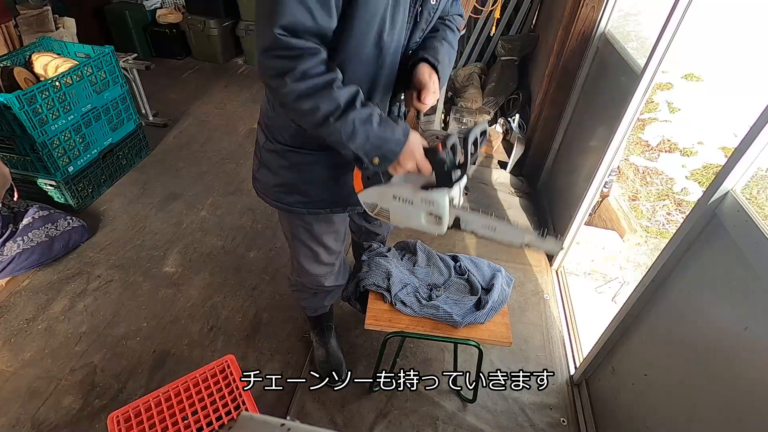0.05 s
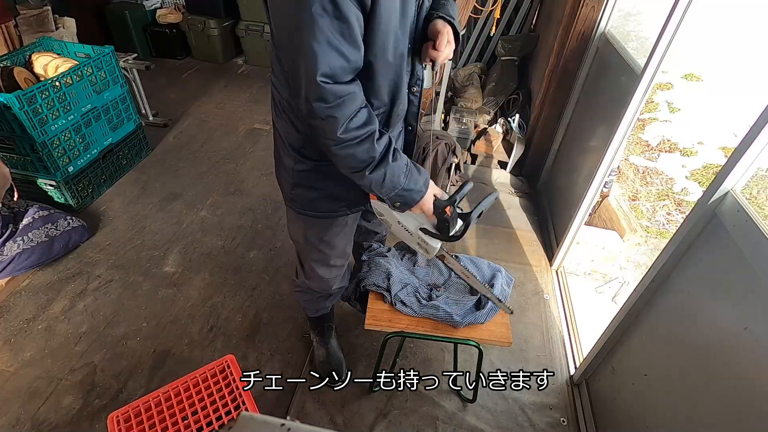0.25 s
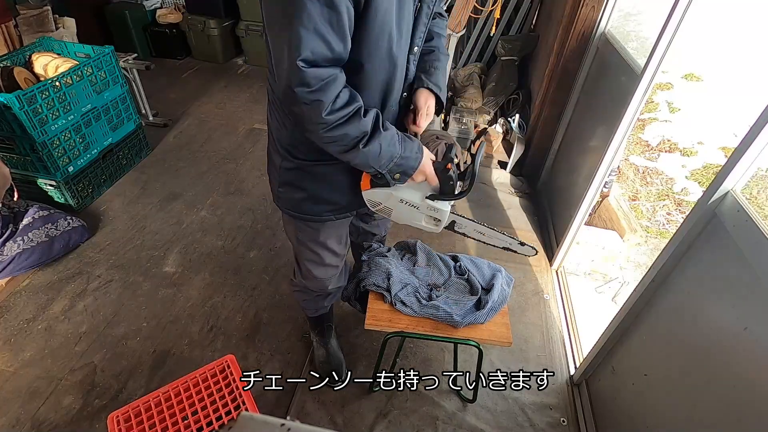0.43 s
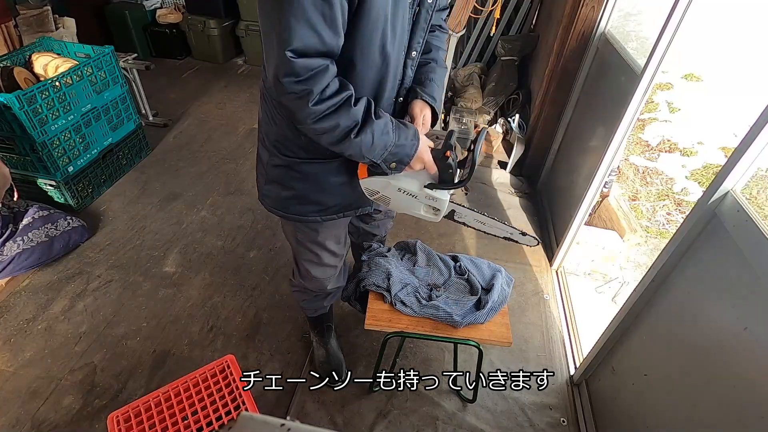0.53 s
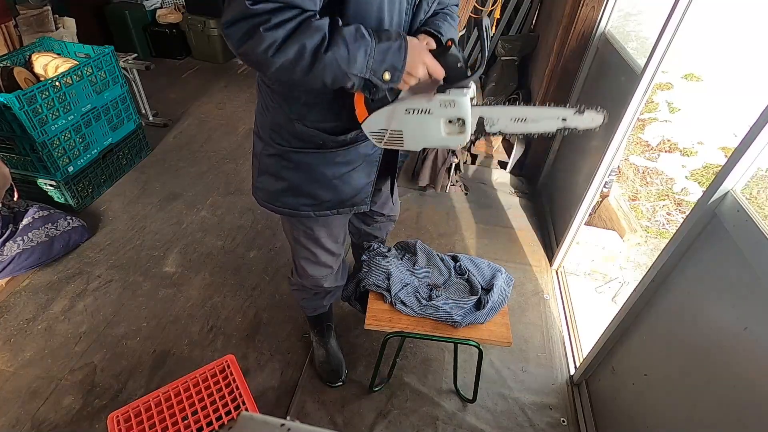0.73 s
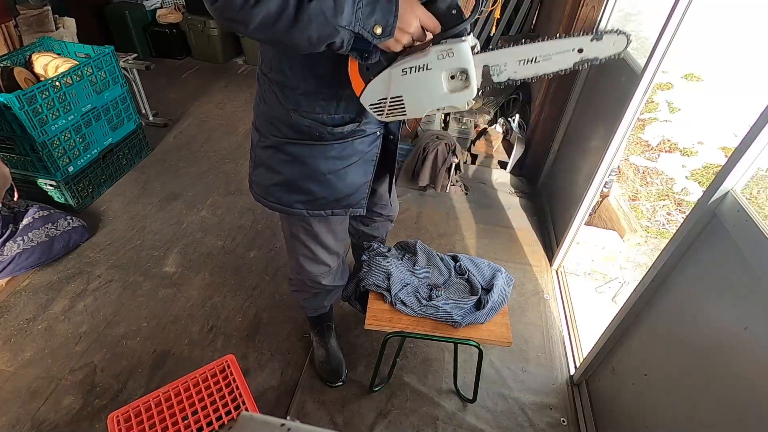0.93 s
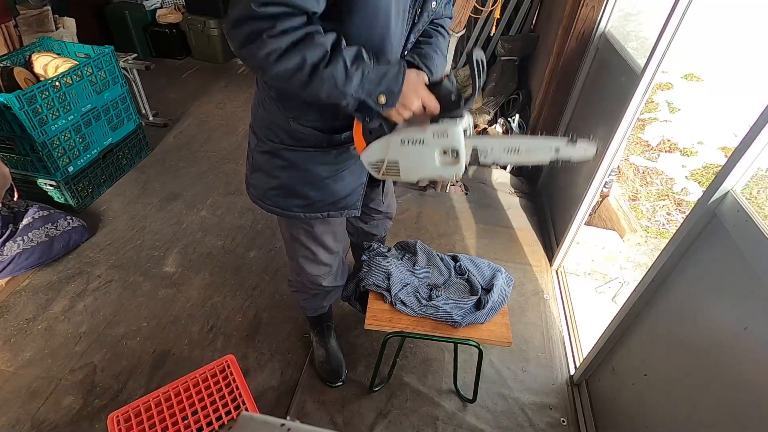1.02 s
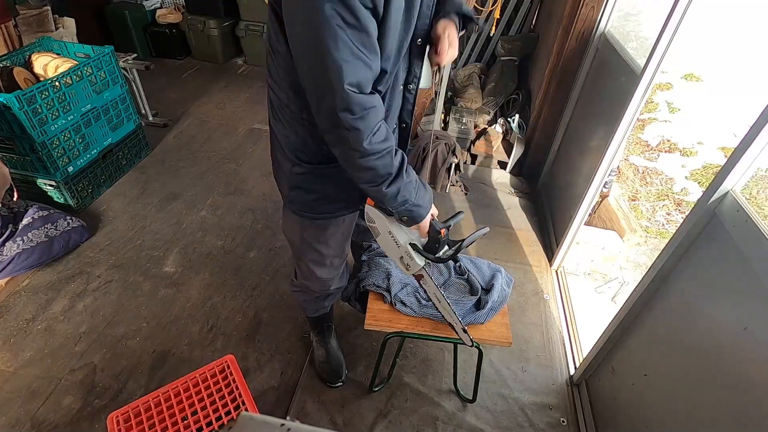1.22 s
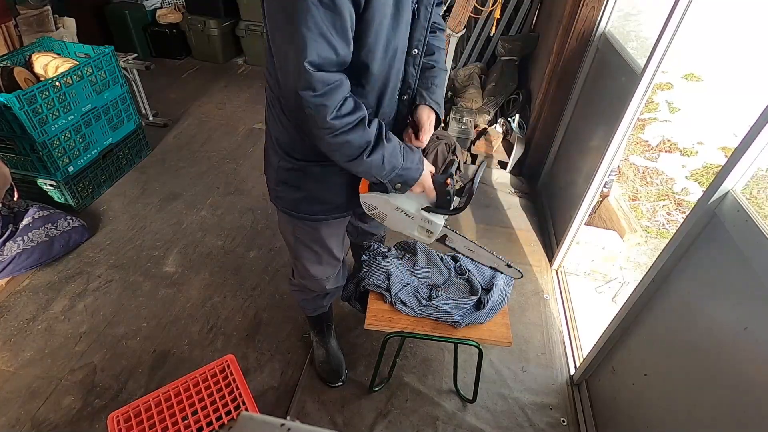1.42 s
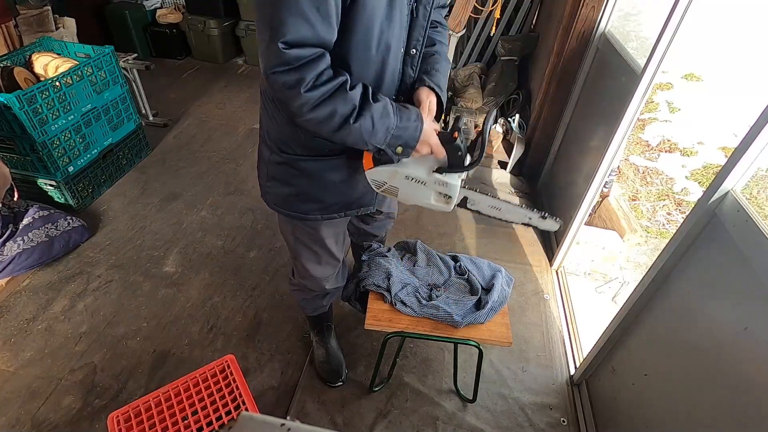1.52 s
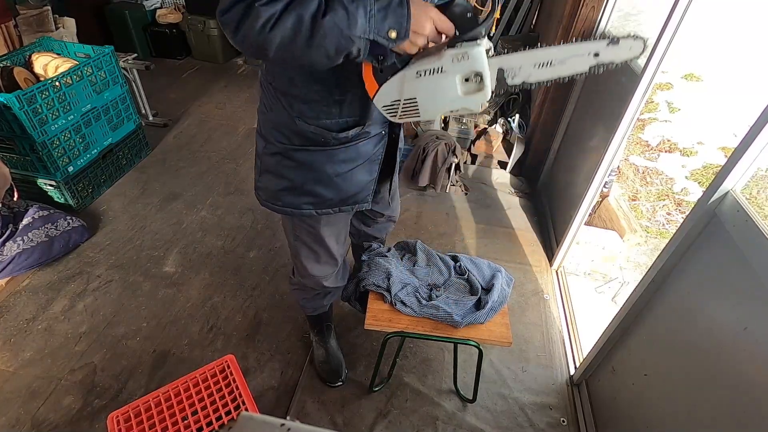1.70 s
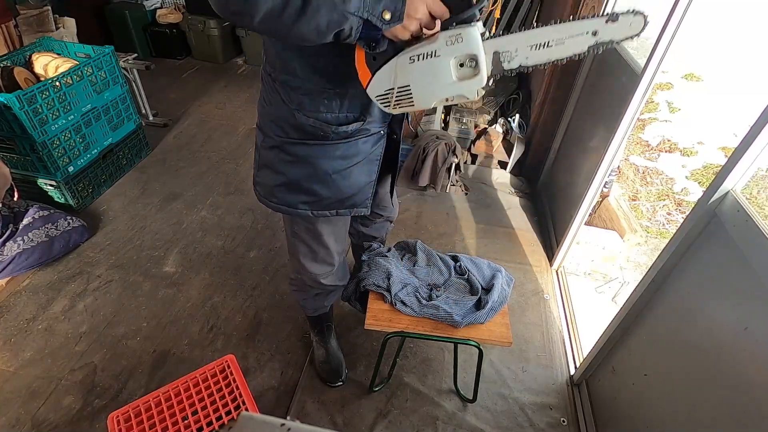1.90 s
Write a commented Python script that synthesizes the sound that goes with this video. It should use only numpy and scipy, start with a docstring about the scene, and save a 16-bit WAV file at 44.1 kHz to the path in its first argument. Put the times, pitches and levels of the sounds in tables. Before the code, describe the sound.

Two starter-cord yanks on a chainsaw, metal clacks and muffled thumps, then ratcheting rewind, no ignition

```python
"""A small chainsaw is pull-started twice in a shed and does not fire. In each yank the pawl catches with
metal clacks, the piston thumps and puffs through the muffler over a few compressions, the cord rewinds with
a ratchet rattle and the grip knocks home. Shaped noise makes the rasp and clacks; decaying sines make the
muffler, starter cup and housing ring. Two close microphone ports on a camera hear it, with the shed's echo,
a low rumble and faint air."""
import sys
import numpy as np
from scipy import signal
from scipy.fft import rfft, irfft
from scipy.io import wavfile
from scipy.ndimage import uniform_filter1d, map_coordinates

SR = 44100
rng = np.random.default_rng(int(sys.argv[2]) if len(sys.argv) > 2 else 0)


def to_wav(sig):
    """Store sig (one row per channel, or 1-D mono) as 16-bit WAV at the path in sys.argv[1].

    Samples outside -1..1 are clipped; the rate is SR.
    """
    pcm = np.clip(np.atleast_2d(sig), -1, 1) * 32767
    pcm = np.round(pcm).astype(np.int16)
    wavfile.write(sys.argv[1], SR, pcm.T)  # frames by channels


def field_ratio(decibels):
    """Amplitude ratio for a level in dB (20 dB per decade); scalars and array-likes work."""
    return 10 ** (np.asarray(decibels, dtype=float) / 20)


N = 85995
T = np.arange(N) / SR
RING, PUFF = 11000, 8800  # lengths of a modal response and a noise burst, samples


def unit(h):
    """Energy normalisation: a response scaled to unit power gain on white noise."""
    return h / np.sqrt(np.sum(h ** 2))


def fade(t, t60):
    """Exponential decay: the amplitude falls 60 dB in t60 seconds."""
    return np.exp(-np.log(1000) * t / t60)


def butter(x, hz, kind):
    """Butterworth filtering with a second-order, maximally flat design."""
    return signal.sosfilt(signal.butter(2, hz, kind, fs=SR, output="sos"), x)


def colour(x, points):
    """Minimum-phase filtering: a causal response through (f/Hz, level/dB) points, by the folded cepstrum."""
    p = np.array(points, float)
    hz = np.maximum(np.arange(2049) * SR / 4096, 1)
    log_gain = np.interp(np.log(hz), np.log(p[:, 0]), p[:, 1]) * np.log(10) / 20
    cepstrum = irfft(log_gain)
    cepstrum[1:2048] *= 2
    cepstrum[2049:] = 0
    h = irfft(np.exp(rfft(cepstrum)))
    return signal.fftconvolve(x, unit(h))[:len(x)]


def ring(modes, tilt_db=0):
    """Modal superposition: decaying sines (f/Hz, level/dB, T60/s), tilted per octave about 1 kHz, peak 1."""
    t = T[:RING]
    h = np.zeros(RING)
    for hz, db, t60 in modes:
        level = field_ratio(db + tilt_db * np.log2(hz / 1000))
        h += level * np.sin(2 * np.pi * hz * t) * np.exp(-np.log(1000) * t / t60)
    return h / np.abs(h).max()


def add(out, s, x):
    """Linear superposition: mixes x into out from time s."""
    i = int(s * SR)
    out[i:i + len(x)] += x[:len(out) - i]


def burst(t60, attack_s=0.0004):
    """Transient noise: white noise with an exponential rise and decay."""
    t = T[:PUFF]
    return rng.standard_normal(PUFF) * (1 - np.exp(-t / attack_s)) * fade(t, t60)


def curves(tables):
    """Amplitude envelope: gain from (t/s, level/dB) tables, practically silent outside them."""
    gain = np.zeros(N)
    for table in tables:
        s, db = np.transpose(table)
        gain += field_ratio(np.interp(T, s, db, left=-150, right=-150))
    return gain


def grains(per_s, scatter_db):
    """Shot noise: random clicks of uneven size over steady noise, rms 1."""
    size = field_ratio(scatter_db * rng.exponential(size=N)) * rng.standard_normal(N)
    clicks = (rng.random(N) < per_s / SR) * size
    x = clicks / clicks.std() + 0.5 * rng.standard_normal(N)
    return x / x.std()


# spectrum of the low rumble and faint hiss: f/Hz, level/dB
AIR = [(15, 2), (30, -3), (70, -2.5), (180, -6), (270, -16.5), (500, -22), (1000, -19.5), (2500, -21.5),
       (5000, -29.5), (9000, -36.5), (15000, -47)]


def air():
    """Stationary noise with a flickering low rumble; the weaker inter-channel part grows in the treble."""
    flicker_db, knot = 4, 2000  # flicker: standard deviation at the knots; knot spacing, samples
    mid, side = (colour(rng.standard_normal(N), AIR) for _ in range(2))
    walk = np.repeat(rng.standard_normal(N // knot + 1), knot)[:N]
    walk = uniform_filter1d(walk, size=knot)
    mid = mid + butter(mid, 280, "low") * (field_ratio(flicker_db * walk) - 1)
    side = field_ratio(-8.5) * butter(side, 910, "high") + field_ratio(-14.0) * side
    return field_ratio(-50.5) * np.array([mid + side, mid - side])


# the hand takes up the grip: t/s, relative level/dB
GRIPS = [(0.1228, -28.5), (1.0986, -40)]
# spectrum of the tick and rustle: f/Hz, level/dB
GRIP_COLOUR = [(470, -43), (800, -17), (2470, 1), (3100, -6), (4030, -3), (7970, -11.5), (14000, -26)]


def grip_ticks():
    """Contact noise: a short tick with a longer, weaker rustle before each pull."""
    tick_t60_s, rustle_t60_s = 0.015, 0.13
    ticks = np.zeros(N)
    for s, db in GRIPS:
        add(ticks, s, field_ratio(db - 6.0) * (burst(tick_t60_s) + 0.52 * burst(rustle_t60_s)))
    return colour(ticks, GRIP_COLOUR)


# cord and pulley rasp, one list per pull: t/s, relative level/dB
CRANK = [
    [(0.14, -45.5), (0.156, -55.5), (0.19, -44.5), (0.212, -31), (0.23, -35.5), (0.24, -23.5), (0.366, -36),
     (0.374, -29), (0.466, -58.5), (0.485, -59)],
    [(1.12, -66), (1.188, -51.5), (1.2, -34.5), (1.252, -29.5), (1.266, -24.5), (1.32, -30.5), (1.328, -18),
     (1.372, -33), (1.39, -28), (1.47, -43)],
]
# spectrum of the rasp: f/Hz, level/dB
CRANK_COLOUR = [(300, -46), (600, 4), (1200, 0), (2000, -1.5), (3000, -1), (4500, -4.5), (6500, -12.5),
                (9000, -18.5), (12000, -24), (15000, -25)]


def cord_rasp():
    """Friction noise: dense grains of cord and pulley, swelling and fading as the hand pulls."""
    grit = colour(grains(per_s=3500, scatter_db=1.5), CRANK_COLOUR)
    return field_ratio(2) * curves(CRANK) * grit


# gas pumped by the turning crank, one list per pull: t/s, relative level/dB
PUMPING = [
    [(0.2, -38.5), (0.248, -12), (0.302, -14.5), (0.328, -19.5), (0.364, -20), (0.39, -33.5), (0.42, -34.5),
     (0.47, -45)],
    [(1.19, -41), (1.222, -49), (1.232, -22.5), (1.246, -22.5), (1.306, -12.5), (1.366, -23.5),
     (1.384, -34), (1.42, -32)],
]
# modes of muffler and crankcase, also rung by the thumps: f/Hz, level/dB, T60/s
MUFFLER = [(58, -15.5, 0.082), (102, -11.5, 0.053), (183, -49, 0.02), (264, -0.5, 0.0625), (414, 4, 0.036),
           (512, 0.5, 0.055), (699, 4, 0.019), (903, -3.5, 0.037), (1130, -30, 0.031)]


def muffler(tilt_db):
    """Cavity resonance: the muffler modes driven by one smooth Gaussian pressure pulse."""
    push_s = 0.00023
    pulse = np.exp(-((T[:100] - 2 * push_s) / push_s) ** 2)
    return np.convolve(pulse, ring(MUFFLER, tilt_db=tilt_db))


def pumped_gas():
    """Source-filter principle: grainy gas flow from the turning crank rings the muffler."""
    flow = curves(PUMPING) * grains(per_s=600, scatter_db=1.6)
    return field_ratio(-5) * signal.fftconvolve(flow, unit(muffler(tilt_db=-1.0)))[:N]


# pawl catching and piston passing top centre:
# t/s, relative level/dB, T60/s, tilt/(dB per octave), loudest pitch f/Hz
CLACKS = [(0.2077, -19, 0.075, 1, 985), (0.212, -9.5, 0.035, -0.5, 2310), (0.2401, -7, 0.021, 4, 3700),
          (0.2467, -5.5, 0.014, 4, 1300), (0.284, -6.5, 0.019, 1.5, 3000), (.3292, -15.5, 0.053, -5.5, 903),
          (.353, -20.5, 0.057, -3, 3460), (0.3703, -19.5, 0.031, 6, 4600), (0.4074, -24.5, 0.057, 8, 4630),
          (1.196, -17.5, 0.023, -3.5, 2330), (1.199, -9, 0.035, 7.5, 1150), (1.267, -5, 0.024, -1.3, 3660),
          (1.2986, -12.5, 0.062, -1.5, 3000), (1.3239, -12, 0.032, 10, 4300), (1.389, -11, 0.023, 1, 8500)]
# spectrum of the clacks before the tilt, also used by the knocks: f/Hz, level/dB
CLACK_COLOUR = [(180, -42.5), (300, -6.5), (1170, 8), (1490, -4), (2650, -3.5), (3380, -14), (4320, -10.5),
                (4620, -12.5), (8880, -28.5), (15000, -69)]


def clacks():
    """Impact excitation: metal contacts as noise bursts, each with a narrow band at its loudest pitch."""
    ping_db, ping_width = -2.5, 0.16  # level beside the broad burst; width relative to the pitch
    out = np.zeros(N)
    for s, db, t60, tilt_db, ping_hz in CLACKS:
        tilted = [(hz, c + tilt_db * np.log2(hz)) for hz, c in CLACK_COLOUR]
        peak = [(ping_hz * (1 + k * ping_width), -abs(k) * 12) for k in (-3, -1, 0, 1, 3)]
        broad = colour(burst(t60, attack_s=0.00082), tilted)
        ping = colour(burst(t60, attack_s=0.001), peak)
        add(out, s, field_ratio(db - 5.5) * (broad + field_ratio(ping_db) * ping))
    return out


# ports opening: t/s, level/dB, tilt/(dB per octave)
THUMPS = [(0.2444, -17.5, -7), (0.2468, -5.5, -1.5), (0.2594, -5.5, -5.5), (0.2858, -3.5, 4),
          (0.298, -9, -3), (0.3313, -8, 12), (0.357, -15.5, 8), (0.407, -30, -15), (0.417, -23.5, -8.5),
          (1.245, -5.5, 10), (1.269, -5.5, -5), (1.28, -6, -1), (1.298, -9.5, 0), (1.311, -6, -5.5),
          (1.332, -31, 7), (1.351, -12, -5)]


def port_thumps():
    """Impulse response of a cavity: each opening port sends one pressure push into the muffler."""
    out = np.zeros(N)
    for s, db, tilt_db in THUMPS:
        push = muffler(tilt_db)
        add(out, s, field_ratio(db) * push / np.abs(push).max())
    return out


# modes of starter cup and spring: f/Hz, width/Hz, level/dB
CUP = [(890, 450, 7), (1696, 210, -3), (2220, 230, -16), (3000, 1200, -3.5), (4390, 210, -3),
       (4746, 526, 7), (4850, 68, -1.5), (5470, 890, -18), (6600, 234, 2.5), (8500, 510, -8.5),
       (11400, 1200, -25), (12200, 1100, -27)]


def cup():
    """Modal resonance struck at another spot each time; bandwidth sets each mode's decay."""
    detune, scatter_db = 0.012, 2  # standard deviations of relative pitch and level
    modes = []
    for hz, width, db in CUP:
        a, b = rng.standard_normal(2)
        level_db = db + scatter_db * b + 20 * np.log10(width / 300)
        modes.append((hz * (1 + detune * a), level_db, 2.2 / width))
    return unit(butter(ring(modes)[:PUFF], 1080, "high"))


# ratchet teeth as the cord rewinds: t/s, relative level/dB
TEETH = [(0.4923, -17.5), (0.5129, -16.5), (0.5288, -21), (0.5446, -20.5), (0.5564, -21.5), (0.570, -13.5),
         (0.583, -15), (0.5984, -18.5), (0.6035, -25), (0.6164, -22.5), (0.6384, -20), (0.6607, -21),
         (0.697, -28.5), (1.397, -16), (1.4244, -20.5), (1.4372, -23), (1.4514, -20), (1.4654, -20.5),
         (1.4809, -18), (1.499, -17), (1.5138, -19.5), (1.5302, -18.5), (1.5487, -18), (1.5649, -18),
         (1.582, -19), (1.604, -22), (1.638, -24)]
# spring sliding between the teeth, one list per pull: t/s, relative level/dB
REWIND = [
    [(0.49, -26), (0.494, -25.5), (0.534, -21), (0.568, -19), (0.672, -28.5), (0.72, -35.5)],
    [(1.38, -32), (1.39, -16.5), (1.604, -26), (1.63, -35), (1.64, -21.5), (1.68, -51)],
]


def ratchet():
    """Repeated impact: each tooth slaps and bounces twice, the spring slides on; all rings the cup."""
    bounce_s, bounce_db = 0.0045, -4.5  # mean spacing; level step per bounce
    out = np.zeros(N)
    slide = field_ratio(-11) * curves(REWIND) * grains(per_s=2500, scatter_db=1.6)
    starts = [int(s * SR) for s, _ in TEETH]
    for (s, db), i, j in zip(TEETH, starts, starts[1:] + [N]):
        x = np.zeros(PUFF)
        add(x, 0, slide[i:min(j, i + PUFF)])
        for k in (0, 1, 2):
            delay = k * bounce_s * (1 + 0.19 * rng.standard_normal())
            add(x, delay, field_ratio(db + 2.5 + k * bounce_db) * burst(0.012, attack_s=0.00076))
        add(out, s, signal.fftconvolve(x, cup()))
    return out


# grip knocking on the housing: t/s, relative level/dB, tilt/(dB per octave), hollow clunk level/dB
KNOCKS = [(0.6546, -5.5, 1.5, -10.5), (1.6519, -13, 6.5, -25.5)]
# modes of the housing: f/Hz, level/dB, T60/s
HOUSING = [(499, -22.5, 0.11), (764, -17, 0.33), (924, -11.5, 0.041), (1477, -4, 0.027), (1724, -4, 0.023),
           (2124, -10.5, 0.02), (2630, -20, 0.017), (3310, -7.5, 0.0081)]


def grip_knocks():
    """Impact on a shell: crack, damped clunk, housing modes, one bounce and a noisy rattle."""
    out, t = np.zeros(N), T[:PUFF]
    clunk = np.sin(2 * np.pi * 929 * t) * (1 - np.exp(-t / 0.0022))
    clunk *= fade(np.maximum(t - 0.0053, 0), 0.003)  # rings until the grip seats and damps it
    for s, db, tilt_db, clunk_db in KNOCKS:
        add(out, s, field_ratio(db) * ring(HOUSING, tilt_db=tilt_db))
        add(out, s, field_ratio(clunk_db) * clunk)
        shell = unit(ring(HOUSING, tilt_db=tilt_db - 7.0)[:600])
        add(out, s, field_ratio(db - 19) * np.convolve(burst(0.2), shell))  # rattle
        add(out, s + 0.0071, field_ratio(db - 4) * ring(HOUSING, tilt_db=tilt_db + 2.0))  # bounce
        add(out, s, field_ratio(db - 6) * colour(burst(0.0051), CLACK_COLOUR))  # crack
    return butter(butter(out, 420, "high"), 420, "high")


SWING = 3000  # samples after which the moving saw meets camera and clutter from a new angle


def swung(x, response):
    """Time-varying convolution: a stereo response drawn anew as the saw swings, cross-faded."""
    out = np.zeros((2, N))
    for i in range(-SWING, N, SWING):
        a = max(i, 0)
        triangle = 1 - np.abs(np.arange(a, i + 2 * SWING) - i - SWING) / SWING
        part = triangle[:N - a] * x[a:i + 2 * SWING]
        y = signal.fftconvolve(part[None], response(), axes=1)[:, :N - a]
        out[:, a:a + y.shape[1]] += y
    return out


def camera_body():
    """Scattering: the camera body spreads the treble, unrelated at the two ports."""
    ports = np.array([unit(burst(0.0062)), unit(burst(0.0062))])
    return field_ratio(1) * butter(ports, 4760, "high")


# level of the shed's echoes: f/Hz, wall echo level/dB, near echo level/dB
SHED_DB = [(101, -40, 17), (500, -5.5, -19.5), (1440, -12, -0.5), (4000, -13, -4.5), (10000, -10, -4)]


def echo(length, column, t60_of):
    """Diffuse reverberation: decaying noise by octave, less alike at the two ports in the treble."""
    t, tail, p = T[:length], 0, np.array(SHED_DB)
    for hz in 90 * 2.0 ** np.arange(8):
        band = [hz / np.sqrt(2), hz * np.sqrt(2)]
        mid, side = butter(rng.standard_normal((2, length)), band, "band")
        level = field_ratio(np.interp(np.log(hz), np.log(p[:, 0]), p[:, column]))
        shape = level * fade(t, t60_of(hz)) / np.sqrt(t60_of(hz))  # energy independent of T60
        spread = min(np.sqrt(hz / 1800), 1) * side * np.array([[1], [-1]])
        tail = tail + shape * (t > 0.0006) * (mid + spread)
    return tail * np.sqrt(np.log(1e6) / SR / 2)


# decay of the wall echo: f/Hz, T60/s
SHED_T60 = [(100, 0.42), (500, 0.15), (1500, 0.59), (4000, 0.9), (10000, 0.47)]


def shed(x):
    """Room acoustics: short reflections of near clutter, changing as the saw moves, and late wall echo."""
    p = np.array(SHED_T60)
    walls = echo(SR, 1, lambda hz: np.interp(np.log(hz), np.log(p[:, 0]), p[:, 1]))
    near = swung(x, lambda: echo(SWING, 2, lambda hz: 0.045))
    return near + signal.fftconvolve(x[None], walls, axes=1)[:, :N]


def two_ports(saw):
    """Interaural-type differences: the left port hears the saw later, louder and with less treble."""
    lag_s, pan_db, shade = 36e-6, 1.23, 0.55  # pan: left over right before shading; shade: treble share lost
    left = map_coordinates(saw, [np.arange(N) - lag_s * SR], mode="nearest")
    left = left - shade * butter(left, 4860, "high")
    return np.array([field_ratio(pan_db / 2) * left, field_ratio(-pan_db / 2) * saw])


def scene():
    """Superposition of direct sound, camera scattering, shed echo and air."""
    saw = grip_ticks() + cord_rasp() + pumped_gas() + clacks() + port_thumps() + ratchet() + grip_knocks()
    return two_ports(saw) + swung(saw, camera_body) + shed(saw) + air()


def top_cut(x):
    """Nothing passes above the cut-off."""
    return signal.sosfilt(signal.butter(12, 16500, fs=SR, output="sos"), x)


def record(dry):
    """Band limiting: the microphone drops the deepest bass and the top."""
    mix = butter(dry, 33.0, "high")
    mix = butter(butter(mix, 11150, "low"), 12300, "low")
    return top_cut(mix)


dry = scene()
out = record(dry)
to_wav(out)
```